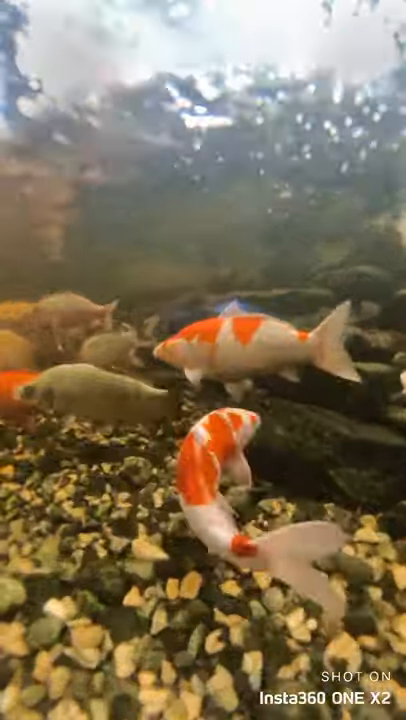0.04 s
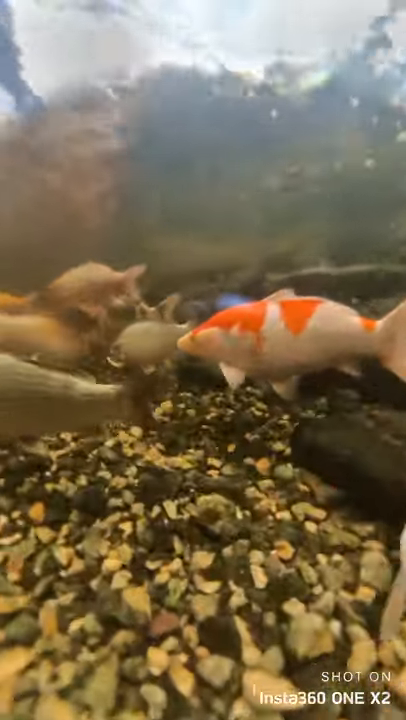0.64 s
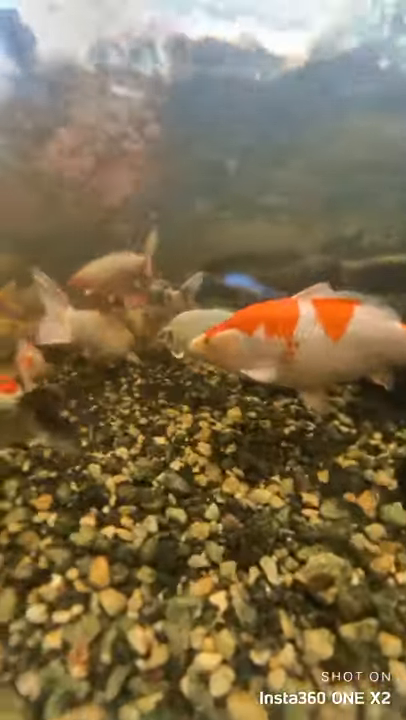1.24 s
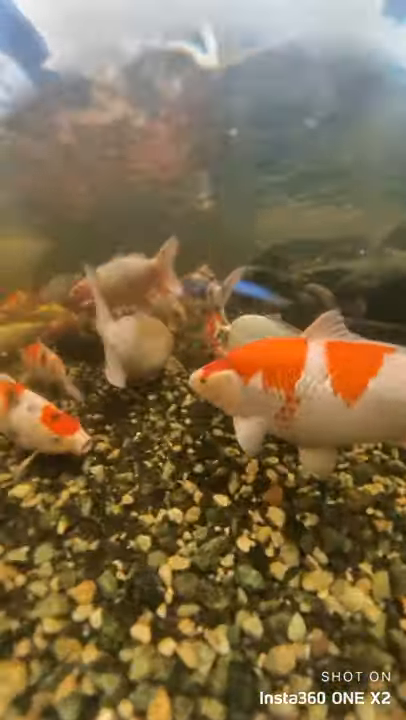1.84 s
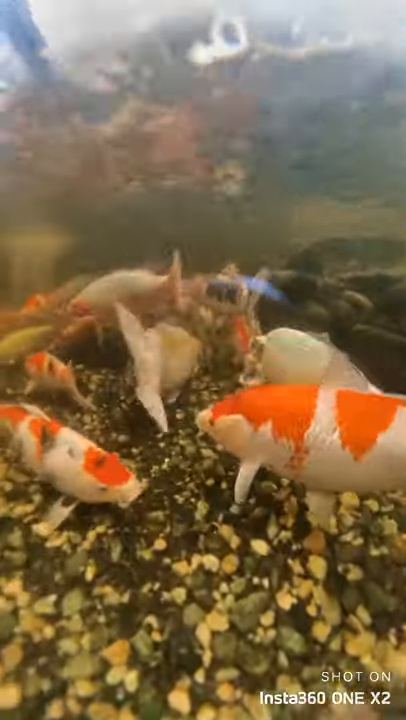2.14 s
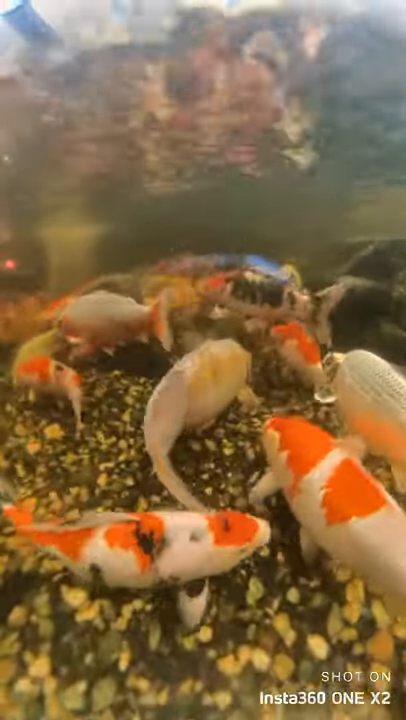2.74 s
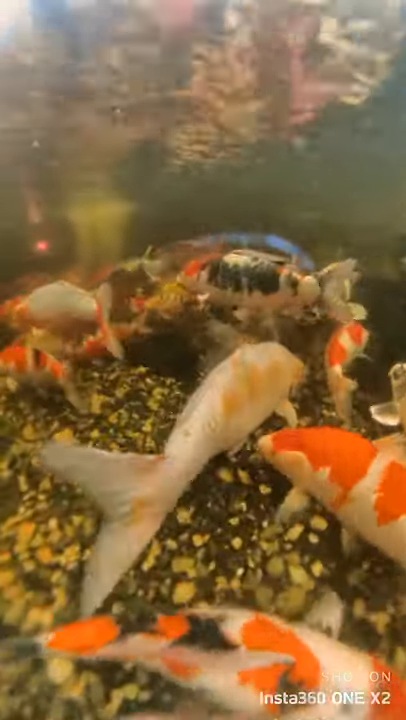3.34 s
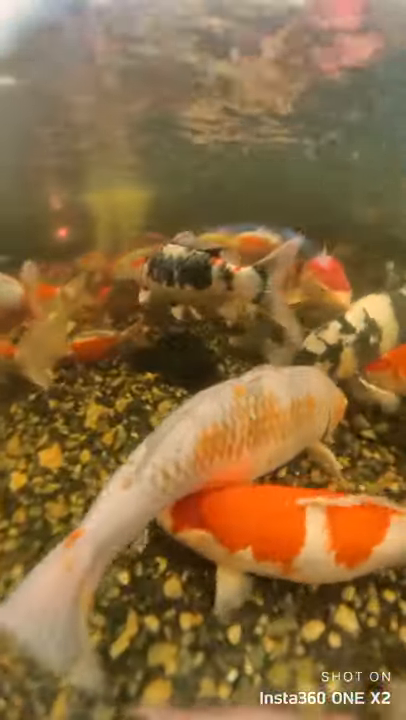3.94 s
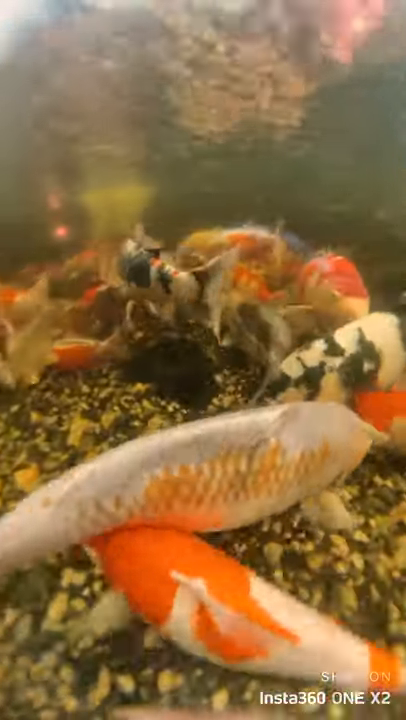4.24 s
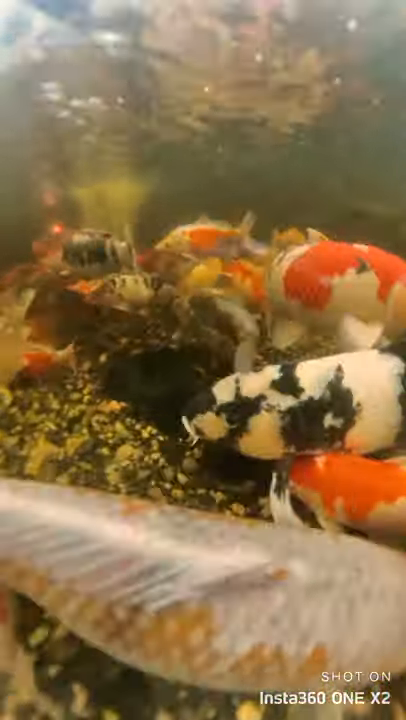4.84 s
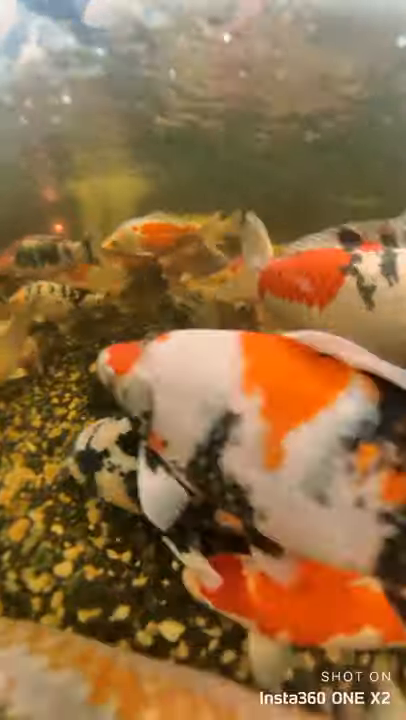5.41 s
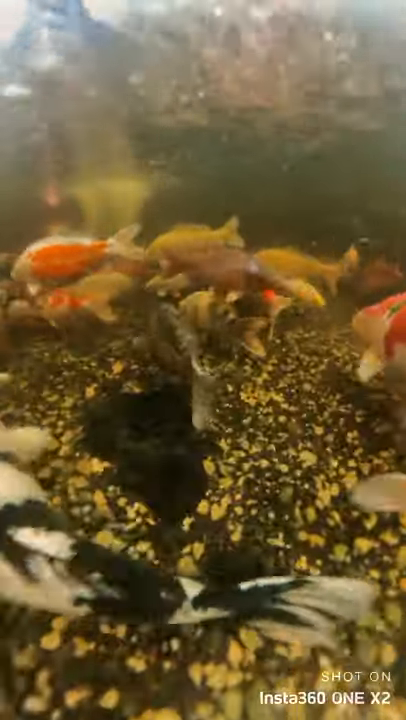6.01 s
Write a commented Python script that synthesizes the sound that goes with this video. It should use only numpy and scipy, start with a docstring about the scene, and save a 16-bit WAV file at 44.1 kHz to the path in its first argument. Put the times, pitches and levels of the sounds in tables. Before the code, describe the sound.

A continuous stream of bubbles patters and fizzes in a fish pond, heard through a submerged microphone whose case gives it a muffled, hollow ring. A low gurgle at the start dies away while a pump hums underneath, slowly fading. Close bubbles ping and tick, soft pops bump the case, and a pebble clicks once. Later, passing fish push low swells of water, and short bubble chirps finish it.

```python
"""A bubble stream gurgles and fizzes in a koi pond, heard through a submerged camera's case,
which rings near 1.3 and 1.55 kHz. Each bubble is a decaying, gliding sine. Near bubbles ping
and chirp, tiny ones burst with a tick; soft pops and one pebble strike reach the case.
Passing fish push low swells of water against it, and a pump hums underneath."""
import sys
import numpy as np
from scipy import signal
from scipy.fft import rfft, irfft
from scipy.io import wavfile
from scipy.ndimage import uniform_filter1d, minimum_filter1d

SR = 44100
rng = np.random.default_rng(int(sys.argv[2]) if len(sys.argv) > 2 else 0)


def output_pcm(signal):
    """Save a mono or channel-first signal as 16-bit PCM at the path in sys.argv[1].

    Samples are clipped to [-1, 1] before scaling.
    """
    pcm = np.clip(np.atleast_2d(signal).T, -1, 1) * 32767
    wavfile.write(sys.argv[1], SR, np.round(pcm).astype(np.int16))


N = 272097
TIME = np.arange(N) / SR
PING_GLIDE_OCT_PER_S, PING_RISE_S = -3.5, 0.0011
# stream strength: time_s, mid_bubble_gain_db, small_bubble_gain_db
STREAM = [(0.0, -24.5, -44.5), (0.38, -25.5, -44), (0.86, -21.5, -41), (2.03, -19.5, -38.5),
          (2.3, -21.5, -37), (2.61, -23.5, -37.5), (2.82, -21, -36.5), (3.02, -18, -33.5),
          (3.27, -19.5, -31), (4.09, -19, -31), (4.31, -22, -33), (4.52, -24.5, -39), (4.81, -19.5, -32),
          (5.09, -17, -34.5), (5.29, -20, -35.5), (5.5, -23, -39), (5.81, -20, -31), (6.17, -18.5, -37.5)]


def case_ring():
    """Mid-size bubbles of the stream excite the case's modes."""
    # case modes: centre_hz, width_hz, gain_db
    modes = [(1298, 141, 2), (1517, 234, 2.5), (1541, 25.6, 8.5), (1690, 72, -25)]
    # bubble size drifts, feeding the lowest mode more or less: centre_s, change_db, half_length_s
    surges = [(3.45, 3.5, 0.95), (5.65, -2.5, 0.45)]
    bubbles = cloud(low_hz=1082, high_hz=2330, cycles=6.1, spread_db=0.84, lift_oct=0.06, count=9000)
    lowest, *higher = ((-1) ** k * undb(db) * resonate(bubbles, hz, width_hz)
                       for k, (hz, width_hz, db) in enumerate(modes))
    ring = cut(lowest * undb(bumps(surges)) + sum(higher), 1090, "highpass", order=8)
    return level(ring, -0.19) * undb(curve(STREAM, column=1))


def gurgle():
    """Big bubbles die away and return a little at the end."""
    # gurgle EQ: freq_hz, gain_db
    eq = [(100, -13.5), (170, 1), (280, -8), (480, -7), (620, -7), (700, -15), (1000, -11), (1250, -23)]
    # gurgle envelope: time_s, gain_db
    envelope = [(0.0, -29), (0.26, -30.5), (2.42, -39), (2.61, -48), (3.14, -42), (4.05, -48),
                (4.83, -43.5), (5.5, -51.5), (6.17, -38.5)]
    big = cloud(low_hz=137.8, high_hz=1205, cycles=17.2, spread_db=0.9, lift_oct=0.3, count=5000)
    return level(colour(big, eq), 3.7) * undb(curve(envelope, column=1))


def patter_and_fizz():
    """Small bubbles patter, the finest fizz; both follow one envelope."""
    # patter EQ: freq_hz, gain_db
    patter_eq = [(1500, -6.5), (1850, -2), (2100, -4.5), (2400, -2), (2650, -15.5), (3000, -19)]
    # fizz EQ: freq_hz, gain_db
    fizz_eq = [(2500, 0.5), (3200, -4), (4000, -3.5), (4600, -8.5), (5100, -10.5), (5900, -14.5),
               (7000, -20.5), (8500, -15)]
    small = cloud(low_hz=1636, high_hz=2946, cycles=42, spread_db=2.0, lift_oct=0.087, count=5000)
    finest = cloud(low_hz=2683, high_hz=8900, cycles=75, spread_db=2.5, lift_oct=0.041, count=20000)
    patter = level(colour(small, patter_eq), 0.11)
    fizz = level(colour(finest, fizz_eq), -16.5)
    return (patter + fizz) * undb(curve(STREAM, column=2))


def puffs():
    """Small clouds of very fine bubbles hiss past."""
    # puffs: centre_s, level_db, half_length_s
    events = [(3.84, -60.5, 0.031), (4.26, -51, 0.069), (4.85, -63, 0.13)]
    envelope = bumps([(centre_s, undb(db), half_s) for centre_s, db, half_s in events])
    fine = cloud(low_hz=3870, high_hz=6810, cycles=23, spread_db=5.5, lift_oct=0.04, count=8000)
    return envelope * level(fine, 0)


def plips(low_hz=1750, high_hz=2500, t60_s=0.023, count=36):
    """Stray small bubbles come close enough to stand out from the patter."""
    out = np.zeros(N)
    for when, pitch, strength, slide in rng.random((count, 4)):
        hz = low_hz * (high_hz / low_hz) ** pitch
        plip = bubble(hz, t60_s, 2 * slide * PING_GLIDE_OCT_PER_S, PING_RISE_S)
        above_patter_db = 10 + 6 * strength
        add(out, when * N / SR, undb(above_patter_db) * plip / np.abs(plip).max())
    return out * undb(curve(STREAM, column=2))


def pings(trim_db=0.5, glide_spread_oct_per_s=2):
    """Single near bubbles ring, most sagging in pitch."""
    # near bubbles: start_s, pitch_hz, gain_db, t60_s
    events = [(0.12, 1800, -17.5, 0.069), (.207, 1615, -12.5, 0.028), (0.244, 164, -13.5, 0.085),
              (.249, 780, -21.5, 0.044), (.460, 873, -19, .06), (.945, 474, -18.5, 0.065),
              (0.875, 1450, -7.5, 0.05), (0.992, 1327, -8.5, 0.038), (1.035, 1360, -7.5, 0.023),
              (1.67, 1330, -8, 0.056), (1.692, 1335, -10.5, 0.048), (1.792, 1815, -17, .05),
              (2.305, 1600, -3.5, 0.0086), (2.422, 1370, -5, 0.018), (2.738, 1975, -7, 0.018),
              (2.88, 2480, -19, 0.02), (3.131, 2040, -14, 0.0078), (3.175, 1470, -9, 0.03),
              (3.314, 1356, -8.5, 0.04), (3.362, 1446, -6.5, 0.021), (3.375, 526, -27, 0.085),
              (3.702, 1905, -4.5, 0.017), (3.758, 1324, -11, 0.07), (3.891, 1325, -6, 0.08),
              (4.079, 1369, -4, 0.041), (4.123, 1400, -8.5, 0.037), (4.202, 2240, -16.5, 0.032),
              (4.49, 1457, -7.5, 0.03), (4.545, 1580, -10.5, 0.033), (4.544, 2084, -18, 0.036),
              (4.67, 1360, -11.5, 0.031), (4.875, 1340, -7, 0.038), (4.998, 1390, -5, 0.064),
              (5.129, 1890, -14, 0.034), (5.168, 1950, -15.5, .035), (5.183, 1397, -7.5, 0.046),
              (5.24, 1315, -7.5, 0.086), (5.644, 1890, -8.5, 0.019)]
    out = np.zeros(N)
    for start_s, hz, db, t60_s in events:
        glide_oct_per_s = rng.normal(PING_GLIDE_OCT_PER_S, glide_spread_oct_per_s)
        ping = bubble(hz, t60_s, glide_oct_per_s, PING_RISE_S)
        add(out, start_s, undb(db + trim_db) * ping / np.abs(ping).max())
    return out


def chirps(ring_hz=1539, half_s=0.0155, trim_db=-2.05):
    """Gliding near bubbles, loudest as their pitch crosses the case's sharp mode."""
    # chirps: centre_s, gain_db, glide_oct_per_s
    events = [(1.473, -9.5, -5), (3.494, -6.5, -3), (4.052, -9.5, 3), (4.503, -11.5, -4), (4.954, -7.5, 1),
              (4.984, -6, 2), (5.045, -5.5, 4.5), (5.519, -6.5, -5.5), (5.931, -15, 4.5),
              (5.961, -5.5, 5.5), (5.996, -1, 5), (6.058, 0, 5)]
    out, t = np.zeros(N), np.arange(-5 * half_s, 5 * half_s, 1 / SR)
    for centre_s, db, glide_oct_per_s in events:
        phase = 2 * np.pi * np.cumsum(ring_hz * 2 ** (glide_oct_per_s * t)) / SR
        add(out, centre_s + t[0], undb(db + trim_db) * np.sin(phase) / np.cosh(1.54 * t / half_s))
    return out


def pops(push_s=0.00025, rebound_s=0.0019, trim_db=2.0):
    """Sudden pressure dips of about 1 ms; the case springs back slowly."""
    # pops on the case: start_s, gain_db
    events = [(1.924, -14.5), (1.968, -8), (2.071, -16.5), (2.217, -16.5), (2.2614, -8.5), (2.279, -18),
              (2.4610, -10.5), (2.4946, -18), (2.5163, -10), (2.537, -15.5), (2.5733, -9.5), (2.579, -9),
              (2.6727, -9), (2.8348, -12), (2.933, -17), (3.2343, -9), (5.709, -21)]
    faint = [(start_s, -21) for start_s in rng.uniform(2.05, 2.85, 6)]
    out, t = np.zeros(N), np.arange(SR // 30) / SR
    dip, rebound = ((t / tau) ** 2 * np.exp(2 - t / tau) / 4 for tau in (push_s, rebound_s))
    snap = np.exp(-t / push_s)
    for start_s, db in events + faint:
        add(out, start_s, undb(db) * (0.66 * rebound - dip - 0.22 * snap))
    return undb(trim_db) * cut(out, 30, "highpass", order=1)


def ticks(ring_trim_db=2.5, crack_trim_db=-5.0):
    """Tiny bubbles burst with a crack and ring briefly."""
    # bursts: start_s, ring_gain_db, pitch_hz, crack_gain_db
    events = [(0.945, -37.5, 3920, -35), (1.032, -24.5, 2550, -26.5), (1.451, -44, 4230, -30),
              (1.557, -37.5, 4200, -29), (3.3134, -30.5, 5560, -26), (3.476, -31.5, 3800, -42),
              (3.625, -28, 3820, -42), (3.9736, -23, 4100, -39), (4.856, -31, 3200, -33),
              (4.9352, -15.5, 2470, -20), (5.288, -35, 3900, -43)]
    out = np.zeros(N)
    for start_s, ring_db, hz, crack_db in events:
        ring = bubble(hz, t60_s=0.023, glide_oct_per_s=0, rise_s=0.00016)
        add(out, start_s, undb(ring_db + ring_trim_db) * ring)
        add(out, start_s, undb(crack_db + crack_trim_db) * crack(t60_s=0.03, low_hz=1300))
    return out


def pebble(ring_db=-15, impact_db=4.5, scrape_db=-3):
    """A stone grazes the case, then hits it: crack, short scrape, brief ring."""
    # contacts: start_s, gain_db
    contacts = [(3.174, -34), (3.178, -40), (3.184, -36), (3.19, -34), (3.2082, -21)]
    # pebble modes: pitch_hz, gain_db, t60_s
    modes = [(3156, 16.5, 0.031), (3285, 14.5, 0.054), (3340, 8, 0.065), (3580, 8, 0.062), (3570, 6, 0.049),
             (3800, -3, 0.06), (4400, 4, 0.079), (4420, 2, 0.069), (4650, 5, 0.053), (5940, -27, 0.029)]
    out, t = np.zeros(N), np.arange(SR // 10) / SR
    ring = sum(undb(db) * np.sin(2 * np.pi * hz * t) * decay(t, t60_s) for hz, db, t60_s in modes)
    for start_s, db in contacts:
        impact = undb(impact_db) * crack(t60_s=0.007, low_hz=3000)
        scrape = undb(scrape_db) * crack(t60_s=0.046, low_hz=3100)
        add(out, start_s, undb(db) * (undb(ring_db) * ring + impact + scrape))
    return out


def moving_water(rumble_db=-29, half_cycles=1.85):
    """Low rumble, plus a few slow pressure cycles as fish sweep past."""
    # rumble EQ: freq_hz, gain_db
    eq = [(15, -19.5), (28, -5), (48, 1), (85, 0.5), (160, -10.5), (300, -7), (380, -20), (700, -39),
          (1300, -34), (2200, -78)]
    # fish swells: centre_s, pitch_hz, peak_db
    swells = [(4.231, 35.8, -20.5), (4.304, 50.6, -13), (4.364, 38.9, -10.5), (4.463, 47, -18),
              (4.524, 86, -15), (4.523, 159, -17.5), (4.604, 37.6, -15.5), (5.349, 45, -12),
              (5.366, 95, -16), (5.512, 31.1, -18.5), (5.617, 35, -18), (5.699, 67, -17.5),
              (5.792, 54.4, -14.5)]
    out = level(colour(rng.standard_normal(N), eq), rumble_db)
    for centre_s, hz, db in swells:
        half_s = half_cycles / hz
        t = np.arange(-3 * half_s, 3 * half_s, 1 / SR)
        add(out, centre_s + t[0], undb(db) * np.cos(2 * np.pi * hz * t) * np.exp(-(t / half_s) ** 2))
    return out


def pump(fade_db_per_s=1.51, waver_db=1.1):
    """Mains hum; each line wavers and takes its share of a slow fade and brief dips."""
    # hum lines: pitch_hz, level_db, swing_share
    lines = [(59.73, -29, 0.2), (120.24, -19, 0.92), (239, -43.5, 1), (360.8, -45.5, 0.5)]
    # dips at full share: centre_s, change_db, half_length_s
    dips = [(.2, -1.5, .3), (2.55, -7.5, 0.36), (4.49, -10, 0.17), (5.48, -8, 0.18)]
    swing_db = bumps(dips) - fade_db_per_s * TIME
    out = np.zeros(N)
    for hz, db, share in lines:
        phase = 2 * np.pi * (hz * TIME + rng.random()) + 0.027 * walk(rate_hz=5.9)
        rms_db = db + share * swing_db + waver_db * walk(rate_hz=6)
        out += np.sqrt(2) * undb(rms_db) * np.sin(phase)
    return out


def bubble(hz, t60_s, glide_oct_per_s, rise_s):
    """A pinched-off bubble: decaying sine with sliding pitch."""
    t = np.arange(int(t60_s * SR) + 2) / SR
    phase = 2 * np.pi * np.cumsum(hz * 2 ** (glide_oct_per_s * t)) / SR
    return np.sin(phase) * (1 - np.exp(-t / rise_s)) ** 2 * decay(t, t60_s)


def cloud(low_hz, high_hz, cycles, spread_db, lift_oct, count):
    """Random bubbles, even power per Hz; each rises by lift_oct while ringing."""
    out = np.zeros(N)
    for when, pitch, strength, length in rng.random((count, 4)):
        hz = low_hz * (high_hz / low_hz) ** pitch
        t60_s = cycles * (0.5 + length) / hz
        db = spread_db * min(-np.log(1 - strength), 4)
        add(out, when * N / SR, hz * undb(db) * bubble(hz, t60_s, lift_oct / t60_s, rise_s=0.5 / hz))
    return out


def crack(t60_s, low_hz):
    """Bright noise burst, peak 1."""
    t = np.arange(SR // 10) / SR
    burst = cut(rng.standard_normal(len(t)) * decay(t, t60_s), [low_hz, 5000], "bandpass", order=2)
    return burst / np.abs(burst).max()


def decay(t, t60_s):
    """Exponential fall, 60 dB per t60_s."""
    return np.exp(-np.log(1000) * t / t60_s)


def undb(db):
    """Decibels to gain."""
    return 10 ** (np.asarray(db) / 20)


def level(x, rms_db):
    """Set the rms level."""
    return x * undb(rms_db) / np.sqrt(np.mean(x ** 2))


def curve(table, column):
    """One column of a timed table at every sample."""
    rows = np.array(table)
    return np.interp(TIME, rows[:, 0], rows[:, column])


def bumps(table):
    """Sum of bell curves from rows of centre_s, height, half_length_s."""
    return sum(height * np.exp(-((TIME - centre_s) / half_s) ** 2) for centre_s, height, half_s in table)


def walk(rate_hz):
    """Smooth random drift, rms 1."""
    hold = int(SR / rate_hz)
    steps = np.repeat(rng.standard_normal(N // hold + 1), hold)[:N]
    return level(uniform_filter1d(uniform_filter1d(steps, hold), hold), 0)


def add(out, start_s, sound):
    """Mix a sound in at start_s."""
    i = max(int(start_s * SR), 0)
    out[i:i + len(sound)] += sound[:max(N - i, 0)]


def cut(x, hz, kind, order):
    """Butterworth filter."""
    return signal.sosfilt(signal.butter(order, hz, kind, fs=SR, output="sos"), x)


def resonate(x, hz, width_hz):
    """One resonance, unity gain at centre."""
    return signal.lfilter(*signal.iirpeak(hz, hz / width_hz, fs=SR), x)


def colour(x, eq):
    """Shape a spectrum by rows of freq_hz, gain_db."""
    hz, db = np.transpose(eq)
    bins_hz = np.maximum(np.fft.rfftfreq(N, 1 / SR), 1)
    return irfft(rfft(x) * undb(np.interp(np.log(bins_hz), np.log(hz), db)), N)


def scene():
    """All sources reach one microphone through the water."""
    stream = case_ring() + gurgle() + patter_and_fizz() + puffs() + plips()
    close_events = pings() + chirps() + pops() + ticks() + pebble()
    return (stream + close_events + moving_water() + pump())[None]


def record(dry, ceiling=0.72, mirror_hz=16000, top_hz=15700):
    """Limiter, low-pass near 7 kHz, and a faint mirror image of the case's ring near 14.5 kHz."""
    gain = np.minimum(1, ceiling / (np.abs(dry) + 1e-9))
    limited = dry * uniform_filter1d(minimum_filter1d(gain, size=441), size=441)  # 10 ms windows
    dull = cut(limited, 6920, "lowpass", order=11)
    mirror = cut(dull * np.cos(2 * np.pi * mirror_hz * TIME), [14200, 14800], "bandpass", order=4)
    band_limit = signal.ellip(8, 0.2, 80, top_hz, fs=SR, output="sos")
    return signal.sosfilt(band_limit, dull + undb(-48.5) * mirror)


dry = scene()
out = record(dry)
output_pcm(out)
```